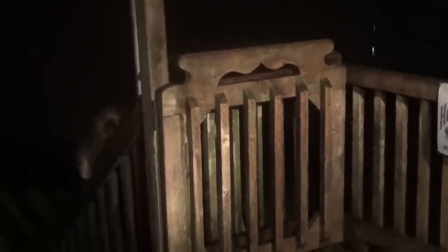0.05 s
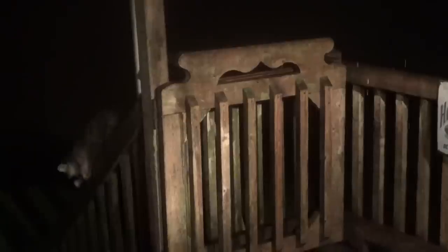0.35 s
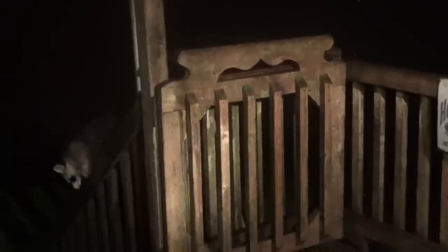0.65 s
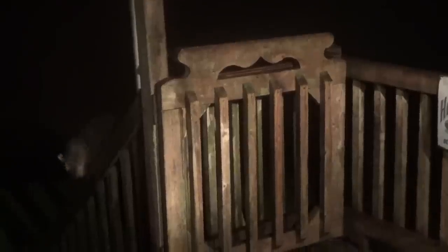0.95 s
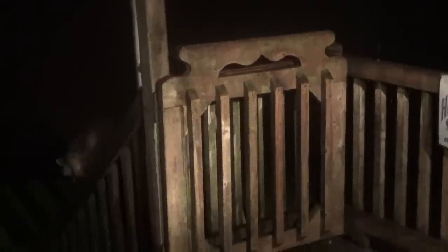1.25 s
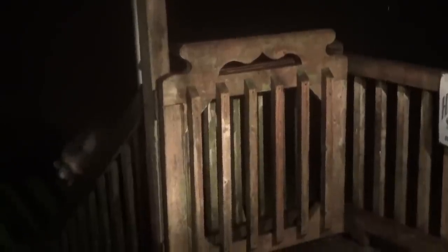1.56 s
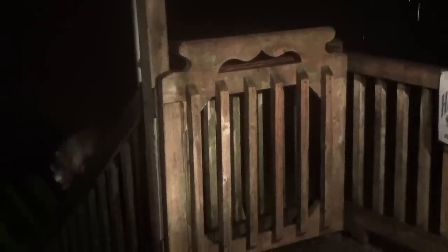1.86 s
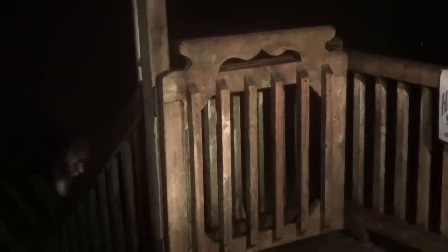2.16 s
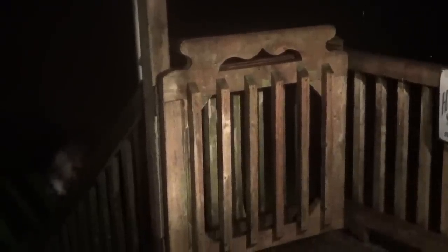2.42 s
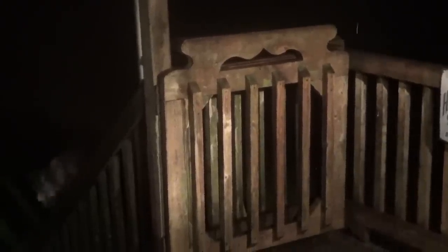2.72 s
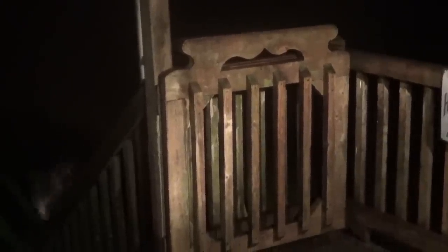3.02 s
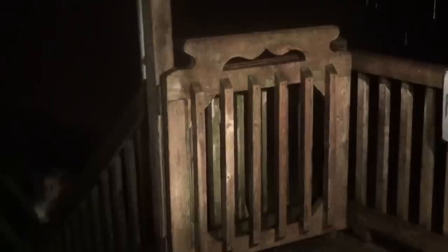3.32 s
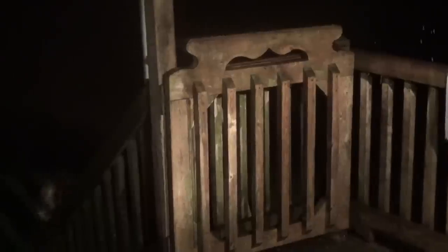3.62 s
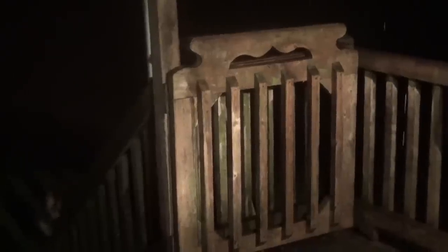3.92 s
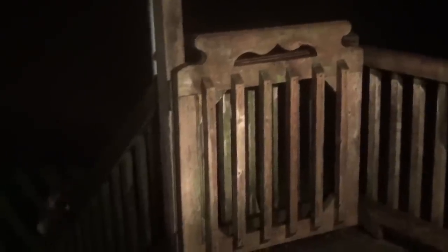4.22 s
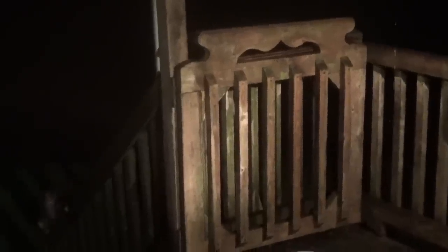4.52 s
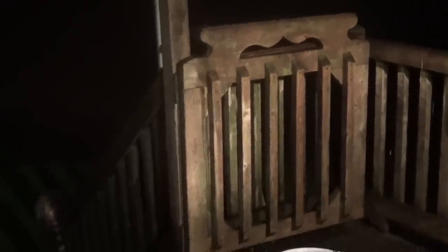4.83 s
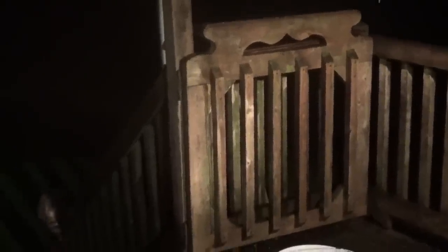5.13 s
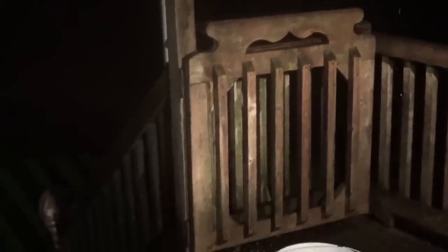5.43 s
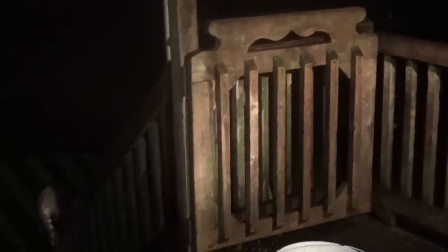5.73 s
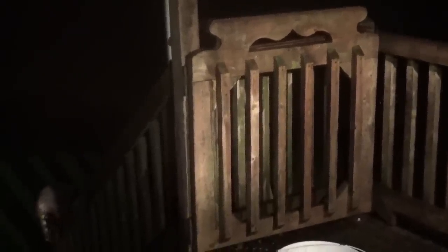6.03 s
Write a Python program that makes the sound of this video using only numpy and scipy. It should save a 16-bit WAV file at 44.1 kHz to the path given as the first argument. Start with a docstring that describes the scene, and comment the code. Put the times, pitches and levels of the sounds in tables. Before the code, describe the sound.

Heavy rain pours onto a wooden deck for about six seconds, heard from under a porch roof. From the start there is a wide, bright hiss, a dense patter of near drops and a low, hollow drumming from the boards. The rain is a little heavier in the first half second, swells gently again around 3 seconds, and eases very slightly toward the end. Drips from the eaves land close in front, several a second at uneven intervals, each a sharp, high splat with a tiny spatter and a short echo. Fatter ones stand out near 0.3, 1.3, 2.3, 2.8, 3.2 and 4.3 seconds, then come closer together from about 5 seconds on. Underneath the whole time, a distant engine gives a low, rumbling drone that slowly climbs in pitch, its throb smoothing out as it gathers speed.

```python
"""Heavy night rain on a wooden deck, heard from under the porch roof.
Fat drips from the eaves splat close by, each a short burst and a spatter of droplets.
Behind them, near drops patter, the boards drum under the blows, and countless far drops merge into a hiss.
Underneath, a distant engine's exhaust drones and slowly gathers speed."""
import sys
import numpy as np
from scipy import signal
from scipy.fft import rfft, irfft, next_fast_len
from scipy.io import wavfile
from scipy.ndimage import uniform_filter1d

SR = 44100
rng = np.random.default_rng(int(sys.argv[2]) if len(sys.argv) > 2 else 0)


def wrap_up_sound(samples):
    """Save the sound to the file named by the first command line argument, as 16-bit audio."""
    columns = np.atleast_2d(samples).T
    # keep every value between -1 and 1, then stretch to whole-number steps
    tamed = np.clip(columns, -1, 1)
    steps = np.round(tamed * 32767).astype(np.int16)
    wavfile.write(sys.argv[1], SR, steps)


N = 276507
TIME = np.arange(N) / SR

# the bright tone of the spray and the patter: pitch_hz, level_db
SPRAY_TONE = [(500, -33), (1500, -12), (2500, -3.5), (3500, -1), (4800, -0.5), (6200, 1.5), (7600, -1),
              (9000, 1), (10000, -2.5), (11000, -9.5)]


def undb(db):
    """Turn decibels into a gain."""
    return 10 ** (np.asarray(db) / 20)


def unit(x):
    """Scale x to an average (rms) level of 1."""
    return x / np.sqrt(np.mean(x ** 2))


def shape(x, response):
    """Filter x by a gain that depends on frequency."""
    size = next_fast_len(x.shape[-1])
    hz = np.maximum(np.arange(size // 2 + 1) * SR / size, 1)
    return irfft(rfft(x, size) * response(hz), size)[..., :x.shape[-1]]


def colour(x, points):
    """Filter x by a curve through rows of pitch_hz, level_db."""
    f, db = np.transpose(points)
    return shape(x, lambda hz: undb(np.interp(np.log(hz), np.log(f), db)))


def band(x, hz, octaves):
    """Keep a bell-shaped band of pitches around hz."""
    return shape(x, lambda f: np.exp(-.5 * (np.log2(f / hz) / octaves) ** 2))


def wander(per_s):
    """A smooth random curve that heads for a new value per_s times a second."""
    hold = int(SR / per_s)
    steps = np.repeat(rng.standard_normal(N // hold + 1), hold)
    return 1.3 * uniform_filter1d(uniform_filter1d(steps, hold), hold)[:N]


def surround(pair):
    """Sound from all around: both ears share one signal; a second is added left and subtracted right."""
    # strength of the second signal, which gives width: pitch_hz, level_db
    stereo_width = [(30, -4), (80, 1), (160, -9), (320, -8.5), (600, -3), (1300, -5), (2800, -6),
                    (5600, -10), (10000, -10)]
    return pair[0] + colour(pair[1], stereo_width) * np.array([[1], [-1]])


def impacts(per_s, spread_db):
    """Randomly timed blows, many small and a few big."""
    size = undb(spread_db * np.minimum(rng.standard_exponential(N), 4))
    return (rng.random(N) < per_s / SR) * size * np.sign(rng.standard_normal(N))


def engine(start_hz=9.34, rise_hz_per_s=.369, waver_db=1.0, smear_turns=.19):
    """A far eight-cylinder exhaust: only its bass carries, and its lumpy beat smooths as it speeds up."""
    # exhaust tones (the eighth is the firing rate): multiple_of_cycle, slowest_db, fastest_db
    exhaust_tones = [(5, -47, -38.5), (7, -40.5, -39), (8, -28.5, -27), (9, -28.5, -52), (10, -37, -62),
                     (11, -32, -62), (16, -52, -43)]
    # rise and fall of the whole drone: time_s, level_db
    drone_levels = [(0, -3), (1.5, 0), (3.3, -.8), (3.9, -2.8), (4.6, .3), (6.27, -2.8)]
    level_db = np.interp(TIME, *np.transpose(drone_levels))
    cycle_hz = start_hz + rise_hz_per_s * TIME
    cycles = np.cumsum(cycle_hz) / SR
    speed = (cycle_hz - cycle_hz.min()) / np.ptp(cycle_hz)
    out = 0
    for multiple, slow_db, fast_db in exhaust_tones:
        db = level_db + slow_db + speed * (fast_db - slow_db) + waver_db * wander(5.93)
        # the long path delays each tone differently, which smears the throb into a drone
        lag = smear_turns * (multiple - 8) ** 2
        out = out + undb(db) * np.sin(2 * np.pi * (multiple * cycles + lag))
    return out * undb([[-.2], [.2]])


def far_rain(tone, swell_db, flicker_db):
    """Drops too many to tell apart, in sheets that swell and flicker."""
    noise = rng.standard_normal((2, N)) * undb(swell_db * wander(3.85) + flicker_db * wander(40))
    return unit(colour(surround(noise), tone))


def wash_swell(peak_s=3.07, spread_s=0.33, level_db=-39.5):
    """The middle pitches of the far rain swell for a moment."""
    sheet = unit(band(surround(rng.standard_normal((2, N))), hz=850, octaves=0.32))
    return undb(level_db) * np.exp(-.5 * ((TIME - peak_s) / spread_s) ** 2) * sheet


def drumming(per_s=1500, spread_db=2.5):
    """The blows of the rain make the boards ring."""
    # the notes of the boards: pitch_hz, width_hz, level_db
    board_notes = [(157, 30, -7), (216, 32, -3), (264.4, 21, 1.5), (313.4, 31, -2), (374, 105, -3.5)]

    def ringing(hz):
        return np.sqrt(sum(undb(2 * db) / (1 + ((hz / pitch - pitch / hz) * pitch / width) ** 2)
                           for pitch, width, db in board_notes))

    blows = surround([impacts(per_s, spread_db), impacts(per_s, spread_db)])
    return unit(colour(shape(blows, ringing), [(50, -9), (140, 0.5), (420, -1), (1000, -20)]))


def patter(per_s, spread_db, tick_s=0.00048, spatter_s=0.013, spatter_db=-13, bands=8):
    """Near drops all over the deck: each a tick of its own pitch, trailed by a soft spatter."""
    out = np.zeros((2, N))
    t = TIME[:SR // 10]
    for hz in np.geomspace(1800, 10000, bands):
        energy = impacts(per_s / bands, spread_db) ** 2
        tick, spatter = (np.sqrt(np.abs(signal.oaconvolve(energy, np.exp(-2 * t / fade_s))[:N]))
                         for fade_s in (tick_s, spatter_s))
        noise = rng.standard_normal((3, N))
        pan = 0.29 * wander(60)
        direct = tick * noise[0] * np.array([1 + pan, 1 - pan])
        out += band(direct + undb(spatter_db) * spatter * noise[1:], hz, octaves=0.6)
    return unit(colour(out, SPRAY_TONE))


def porch(x, tail_db, fade_s):
    """The roof adds a short wash of echoes that falls 60 dB in fade_s."""
    t = TIME[:SR // 3]
    build_up = 1 - np.exp(-t / 0.0048)
    tail = surround(rng.standard_normal((2, len(t)))) * undb(-60 * t / fade_s) * build_up
    response = undb(tail_db) * unit(tail) / np.sqrt(len(t))
    response[:, 0] += 1  # the direct sound
    return signal.fftconvolve(x, response, axes=1)[:, :N]


def splat(hz, octaves, spatter_db, burst_s=.0003, spatter_s=0.0057):
    """One drip, landing at sample 64: a burst on the wet wood, then a spatter of droplets."""
    t = (np.arange(2048) - 64) / SR
    age = np.maximum(t, 0)
    # bigger drops sound lower and take longer to flatten
    slower = min((8000 / hz) ** 2, 16)
    burst = np.sign(rng.standard_normal(len(t))) * np.exp(-age / (burst_s * slower))
    droplets = rng.standard_normal(len(t)) ** 3 * np.exp(-age / spatter_s)
    burst, droplets = (unit(band(x * (t >= 0), hz, octaves)) for x in (burst, droplets))
    return unit(burst + undb(spatter_db) * droplets) / np.sqrt(len(t))


def small_drips(per_s=4.5, level_db=-7, pitch_hz=6300, width_octaves=.36):
    """List the smaller drips, each at a random moment in its own slot of time."""
    rows = []
    for slot in range(int(per_s * N / SR)):
        start_s = (slot + rng.random()) / per_s
        size, pitch = np.clip(rng.standard_normal(2), -2, 2)
        rows.append((start_s, level_db + 1.2 * size, pitch_hz * 2 ** (.35 * pitch), width_octaves))
    return rows


def drips(boost_db=3.0, widen=1.17):
    """Drips from the eaves land one by one in front of the porch."""
    # the fattest drips, plus at 5.464 s the low knock of a loose board struck by a heavy drop, before boost_db
    # and widen: start_s, level_db, pitch_hz, width_octaves
    fat_drips = [(.192, -4.5, 4600, .6), (.2223, -3.5, 3330, .23), (.334, 2, 8500, 0.76),
                 (1.3093, 2, 8600, .45), (1.357, -7, 4300, .28), (1.366, -2, 8400, .5),
                 (2.021, -3, 6600, .5), (2.3046, 1, 7600, 0.71), (2.766, 1.5, 8100, 0.55),
                 (3.1622, 1, 9050, 0.32), (3.6078, -6.5, 3500, .32), (4.3101, 1, 6300, 0.88),
                 (4.334, -5, 4970, .53), (4.7994, -1.5, 9000, 0.32), (5.064, 0, 5700, .95),
                 (5.16, -5.5, 5000, .34), (5.4375, -5, 5500, .35), (5.4622, 1, 3900, .8),
                 (5.464, -6, 1110, .21), (5.863, -2, 6200, 0.98), (5.8848, -4.5, 4400, .9),
                 (6.2064, 0, 7600, .52)]
    # echoes off the nearest boards and posts: delay_s, level_db
    near_echoes = [(.0037, -5.5), (.0066, -6)]
    # the film of water on the wood dulls the very top of each splat: pitch_hz, level_db
    water_film = [(9000, 0.5), (10000, -1), (11000, -8.5)]
    out = np.zeros(N + 4096)
    for start_s, db, hz, octaves in fat_drips + small_drips():
        spatter_db = -4 - .8 * db  # weak drips are mostly spatter
        drop = undb(db + boost_db) * splat(hz, widen * octaves, spatter_db)
        start = max(int(start_s * SR) - 64, 0)
        out[start:start + len(drop)] += drop
        # each lands on another spot, so its echoes come a little sooner or later
        for delay_s, echo_db in near_echoes:
            late = start + int(delay_s * SR * rng.uniform(0.94, 1.1))
            out[late:late + len(drop)] += undb(echo_db) * drop
    return porch(colour(out[None, :N], water_film), tail_db=-3.5, fade_s=0.17)


def scene(right_db=.5, left_db=0.36):
    """Mix the engine, rain and drips; the rain's lows lean right and its highs lean left."""
    # the dull tone of the far wash of rain: pitch_hz, level_db
    wash_tone = [(20, -7), (45, -8), (90, 3), (150, -1.5), (300, -4.5), (500, -1), (1000, 0), (1400, -2),
                 (2000, -2.5), (3000, -8.5), (6000, -16), (11000, -31)]
    # heavier sheets of rain pass over the deck: peak_s, spread_s, rise_db
    rain_surges = [(.15, 0.24, 1.55), (3.032, .2, 0.7)]
    surge_db = sum(db * np.exp(-.5 * ((TIME - peak_s) / spread_s) ** 2)
                   for peak_s, spread_s, db in rain_surges)
    # the downpour slowly eases: each layer loses a fraction of a decibel a second
    wash_db = -28 - 0.5637 * TIME + .4 * surge_db
    boards_db = -33.0 - .6 * TIME + surge_db
    spray_db = -29.9 - .2 * TIME + surge_db
    wash = undb(wash_db) * far_rain(wash_tone, swell_db=0.42, flicker_db=0.75)
    boards = undb(boards_db) * drumming()
    spray = undb(spray_db) * far_rain(SPRAY_TONE, swell_db=1.0, flicker_db=1.0)
    near_drops = undb(spray_db - 3.5) * patter(per_s=900, spread_db=4.0)
    lows = (wash + boards + wash_swell()) * undb([[-right_db], [right_db]])
    highs = (spray + near_drops) * undb([[left_db], [-left_db]])
    return engine() + lows + highs + drips()


def record(dry, top_hz=11130):
    """Steeply cut the treble above top_hz."""
    return signal.sosfilt(signal.ellip(12, .2, 80, top_hz, fs=SR, output="sos"), dry)


dry = scene()
out = record(dry)
wrap_up_sound(out)
```